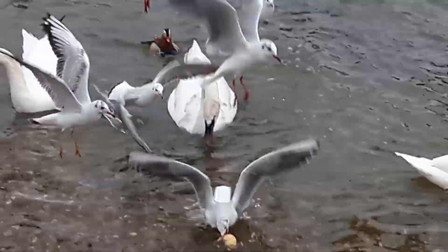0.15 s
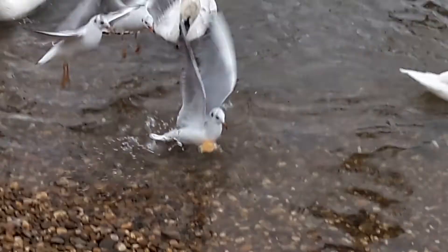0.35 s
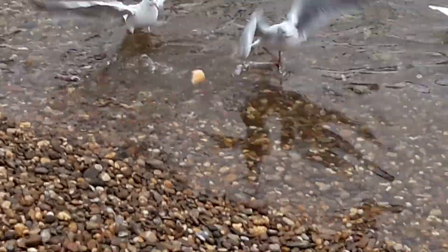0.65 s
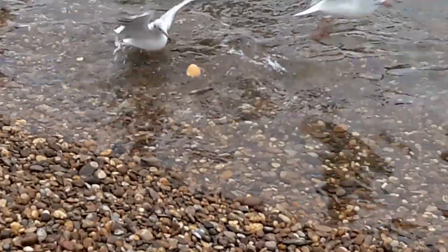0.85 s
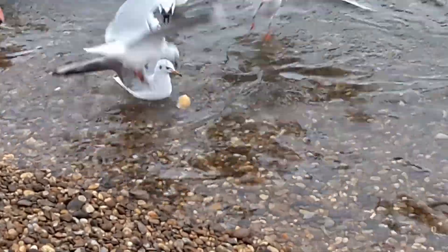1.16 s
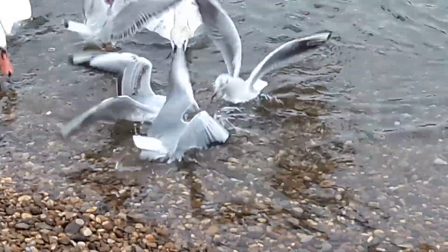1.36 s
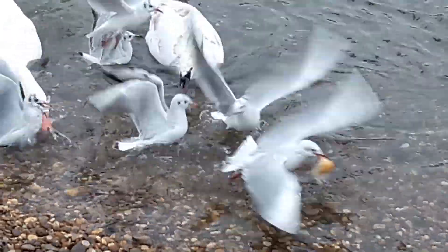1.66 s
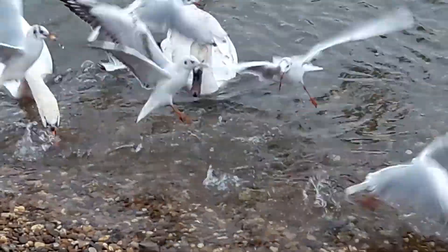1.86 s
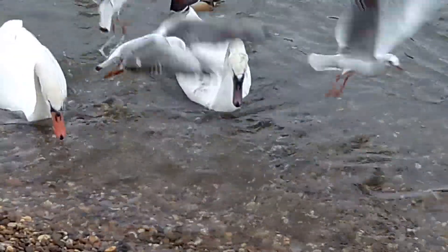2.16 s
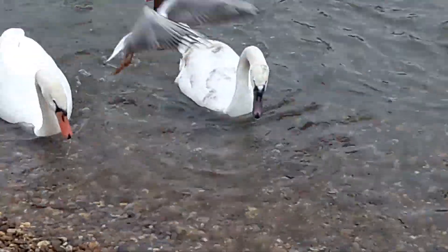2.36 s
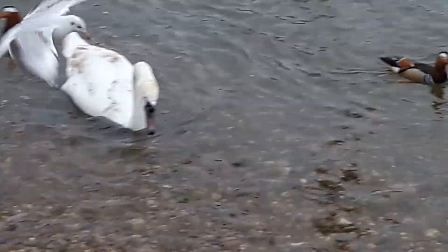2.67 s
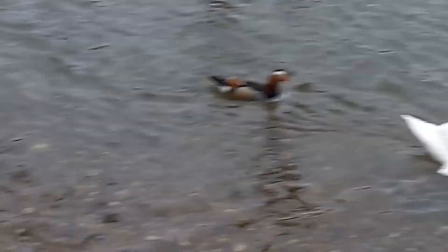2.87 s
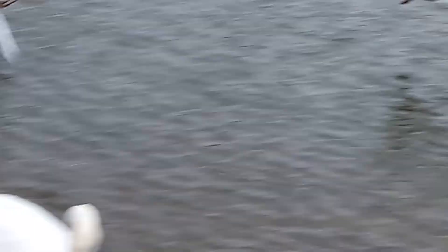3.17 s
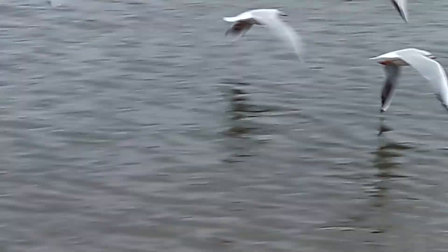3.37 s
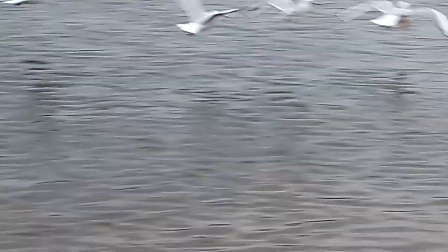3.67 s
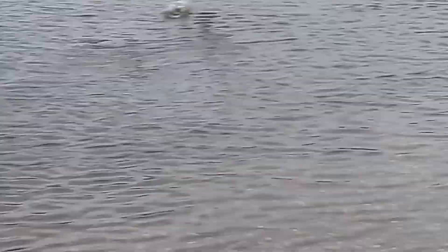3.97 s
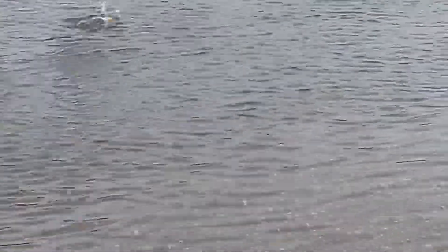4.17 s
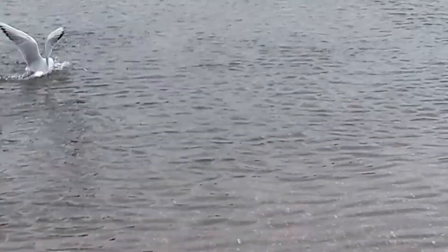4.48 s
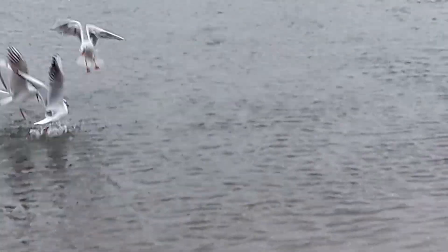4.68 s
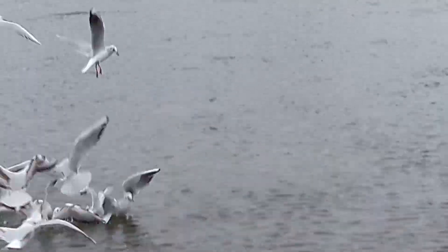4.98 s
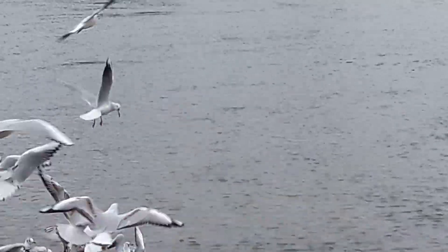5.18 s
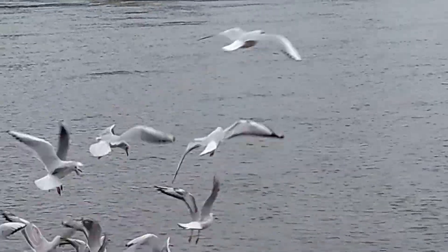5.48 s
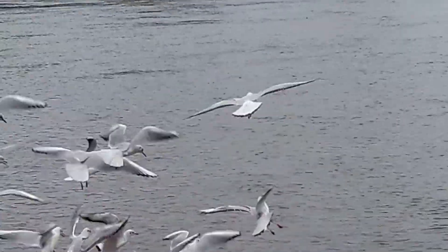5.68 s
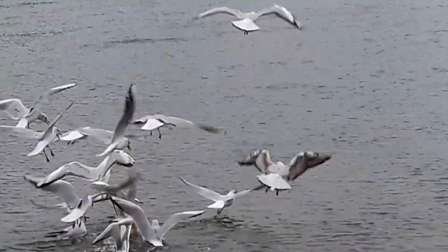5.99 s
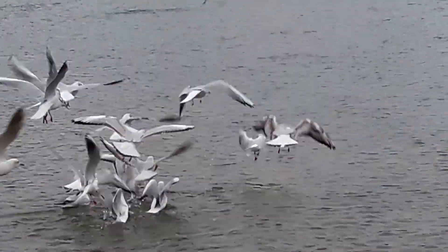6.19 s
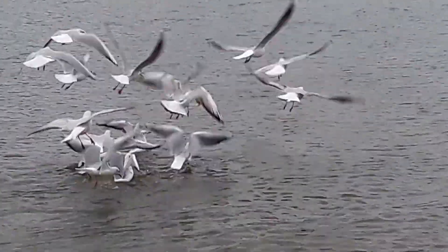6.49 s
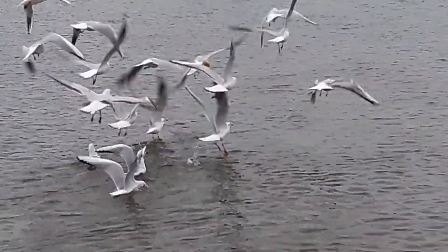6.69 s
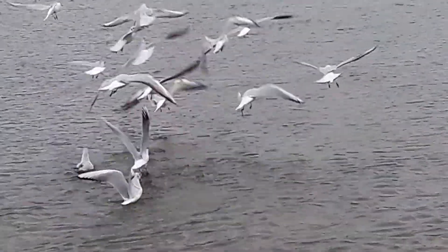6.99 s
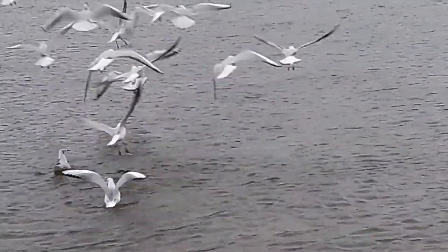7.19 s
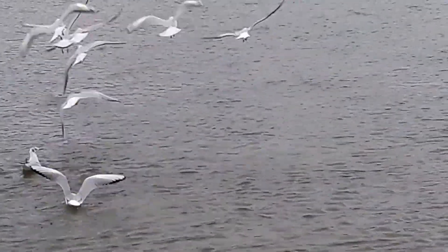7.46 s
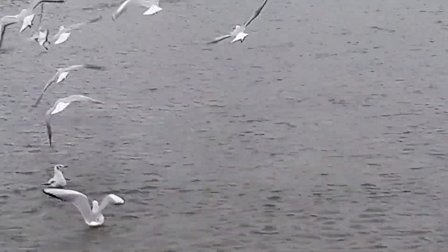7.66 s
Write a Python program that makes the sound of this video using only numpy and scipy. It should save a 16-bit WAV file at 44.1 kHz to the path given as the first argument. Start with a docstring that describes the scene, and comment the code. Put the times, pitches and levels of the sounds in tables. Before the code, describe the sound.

Gulls squabble with harsh yelps and screams over splashes and lapping water, while wind buffets the microphone.

```python
"""Gulls squabbling at a river's edge

A flock fights over bread, close to the microphone at first, then far out on the water. Harsh yelps,
clear mews, drawn-out cries and two long screams overlap, each a syrinx tone chopped into a rasp
and shaped by throat and beak. Wings and feet splash, small waves lap, and wind buffets the stereo
microphone, mostly its left port."""
import sys
import numpy as np
from scipy import signal
from scipy.fft import rfft, irfft, next_fast_len
from scipy.io import wavfile
from scipy.ndimage import uniform_filter1d, map_coordinates

SR = 44100
rng = np.random.default_rng(int(sys.argv[2]) if len(sys.argv) > 2 else 0)


def inscribe(sig):
    """Save sig as 16-bit PCM at rate SR to the path in sys.argv[1].

    A 1-D sig is mono; a 2-D sig holds one channel per row.
    Samples are clipped to [-1, 1] before scaling.
    """
    pcm = np.round(np.clip(np.atleast_2d(sig).T, -1, 1) * 32767)
    wavfile.write(sys.argv[1], SR, pcm.astype(np.int16))


N = 345303
TIME = np.arange(N) / SR

# Harsh cries of the nearer birds: (middle [s], length [s], mid pitch [Hz], glide [octaves],
# roughness [0-1], level [dB], beak opening [dB], strain [dB], beak ring [Hz], right lead [samples])
YELPS = [(0.049, 0.071, 1100, .1, 0.72, -35.5, 7, -3, 3430, -2),
         (0.138, 0.039, 974, 0.019, 0.66, -33.5, -1.5, -13, 2820, -1.5),
         (0.175, 0.054, 1189, 0.045, 0.8, -31.5, 6, 2.5, 3570, -4),
         (.264, 0.044, 1026, 0.0073, 0.23, -26.5, 3, -10, 3100, 6),
         (0.95, 0.11, 1155, 0.015, 0.97, -25.5, 0.5, -4, 3440, 3),
         (1.0, .082, 956, -0.17, 0.74, -33, 2, -2.5, 2930, 2.5),
         (1.049, 0.072, 1008, 0.034, 0.57, -27.5, -6.5, -13, 3500, -2),
         (1.106, 0.028, 844, -0.015, 0.66, -33.5, -7, -25, 3400, 2),
         (1.172, 0.039, 890, -0.079, 0.8, -37.5, 3, -15, 3200, 0),
         (1.207, 0.083, 1065, -0.096, 0.73, -22.5, -3, -8, 3270, -1),
         (1.298, 0.082, 1068, 0.049, 0.68, -26, -1, -5, 3290, 2),
         (1.358, .092, 1004, -0.00016, 0.7, -30, -3.5, -12, 3180, -1.5),
         (1.445, 0.051, 867, -0.077, 0.97, -36.5, -4, -24, 2920, -4.5),
         (1.523, 0.087, 841, 0.036, .6, -31.5, -5.5, -18, 2600, -1.5),
         (1.63, .12, 1053, 0.0082, 0.82, -34, -3, -17, 3070, -7),
         (1.728, .095, 930, -0.18, 0.74, -29, -7, -13.5, 2700, -1.5),
         (1.819, .07, 1055, -0.12, 0.66, -22.5, -18, -22, 2580, .5),
         (1.854, 0.089, 1019, -0.01, 0.9, -32, 1.5, -8, 2950, 5),
         (2.167, 0.094, 760, -0.12, 0.7, -39.5, -7, -15, 2880, 1.5),
         (2.309, .12, 839, 0.077, 0.69, -33.5, -7, -19, 3050, -1.5),
         (2.431, 0.091, 890, -0.01, 0.43, -31, -3.5, -9.5, 2680, 3),
         (2.502, 0.064, 781, -0.11, .4, -31, -14, -22, 3780, 1),
         (2.937, 0.077, 898, 0.055, 0.44, -27.5, -3.5, -26, 2730, 6),
         (3.751, 0.084, 802, 0.015, 0.77, -40.5, -8, -10, 3830, -8),
         (3.97, 0.063, 1059, 0.062, 0.57, -33.5, -6.5, -13, 3130, -2.5),
         (4.243, 0.064, 930, -0.052, 0.8, -45, 3, -2, 2660, -2),
         (4.399, .11, 1069, -0.16, 1.03, -32.5, -2, -10, 3300, 17),
         (4.522, .11, 1034, 0.0031, 0.55, -28.5, -2, -12.5, 3120, -9),
         (4.598, 0.099, 898, -0.018, 0.4, -32.5, 2.5, -4.5, 2760, -1.5),
         (4.672, 0.099, 850, 0.41, 0.4, -34, 3.5, -18, 2610, -5),
         (4.721, 0.062, 1177, 0.22, 0.6, -25, 1, -7, 2870, -2),
         (4.756, 0.08, 1060, -0.018, 0.4, -32, 12, 0, 3100, -2.5),
         (4.797, .11, 1170, -.21, .65, -35, -5, 0.5, 3600, -2.5),
         (4.911, 0.17, 897, -.085, 0.9, -37, -1, -15, 2970, -5),
         (5.229, .12, 1046, 0.12, 0.86, -31, 0, -8.5, 3220, -2.5),
         (5.384, 0.18, 1420, 0.079, 0.65, -40, 4.5, -3, 2900, -2.5),
         (5.636, .11, 1146, 0.26, 0.63, -31, -1, -9.5, 3560, -2),
         (5.749, .16, 1155, 0.12, 0.56, -31.5, -2.5, -4.5, 3190, -2.5),
         (5.843, .08, 1330, .2, 0.5, -40, 9.5, 1, 4100, -2.5),
         (5.93, 0.12, 1068, -0.13, 0.68, -32, -2.5, -7.5, 3080, -2.5),
         (6.016, .13, 1129, .2, 0.62, -31, -1.5, -4, 3500, -3),
         (6.085, .12, 1233, -0.22, 1, -33, .5, -5.5, 3060, -2.5),
         (6.184, .15, 985, 0.29, 0.74, -32, -1, -11, 3050, -2.5),
         (6.273, .17, 1165, -0.034, 0.64, -32.5, -2, -7, 3450, -2.5),
         (6.4, 0.13, 1156, 0.29, 0.83, -34, 2.5, -6.5, 3420, -2),
         (6.457, 0.12, 1093, -0.071, 0.48, -39, 7.5, 2, 3300, -2.5),
         (6.57, .11, 836, 0.23, 0.8, -33.5, -2, -12.5, 3060, -2),
         (6.641, 0.1, 1210, -0.14, 0.48, -39, 2, -10, 3000, -1.5),
         (6.714, 0.085, 850, -.17, 0.73, -38, -4, -25, 2780, -2.5),
         (7.005, 0.092, 930, -0.28, 0.55, -31, -9, -30, 3000, -3),
         (7.178, 0.096, 944, -0.25, .48, -32, -5.5, -18, 2630, 2),
         (7.251, .085, 1026, 0.32, 0.34, -34, -16, -33, 3210, -2.5),
         (7.295, 0.074, 1060, -0.042, 0.9, -38.5, 2, -15, 3560, -3),
         (7.387, .11, 994, .16, 0.94, -38.5, -6, -28, 2890, -3),
         (7.53, 0.081, 1141, -0.022, 0.58, -30.5, 0.5, -14, 2840, -3),
         (7.619, .12, 1073, -.33, 0.83, -36.5, 2, -14, 2820, -3),
         (7.695, 0.14, 1072, 0.12, .7, -34, -6.5, -17, 3270, -4)]
def yelps(gain_db=-0.66):
    """The nearer birds yelp over one another, each from its own direction."""
    out = np.zeros((2, N))
    for s, length, hz, glide, rough, db, beak_db, strain_db, beak_hz, lead in YELPS:
        sound = yelp(length, hz, glide, rough, beak_db, strain_db, beak_hz)
        add(out, s - length / 2, placed(amp(db + gain_db) * sound, lead))
    return out


def yelp(length, hz, glide, rough, beak_db, strain_db, beak_hz, sag=.24):
    """A harsh, gliding cry whose pitch sags with the effort at both ends."""
    push = effort(length)
    pitch = hz * (1 - sag * (1 - push) ** 2) * 2 ** (glide * np.linspace(-.5, .5, len(push)))
    rasp = 0.62 - 0.25 * np.log2(hz / 1034)  # lower cries rasp more deeply
    return cry(push, pitch, rough, rasp, beak_db, strain_db, beak_hz)


def effort(length, swell_s=.05):
    """A cry's push of air: up from 0 to 1, held, and down again."""
    t = np.arange(0, length, 1 / SR)
    return np.clip(np.minimum(t, length - t) / min(swell_s, length / 2), 0, 1)


def cry(push, hz, rough, rasp, beak_db, strain_db, beak_hz):
    """One short cry, loudest and brightest where the push is strongest."""
    throat = min(np.mean(hz) / 1000, 1.12) ** 0.7  # the throat lengthens for low cries
    throat *= 2 ** (.04 * rng.uniform(-1, 1))  # each bird has its own throat and rasp rate
    rasp_hz = 95.5 * 2 ** (.3 * rng.uniform(-1, 1))
    ease_db = 12 * (1 - push) ** 2  # the beak closes and the strain eases towards the ends
    sound = voice(hz, rough, rasp_hz, rasp, beak_db - ease_db, strain_db - ease_db, beak_hz, throat)
    return np.sin(np.pi / 2 * push) ** 1.01 * sound


def syrinx(hz, rough, rasp, flutter, uneven_db, smear_rad=1.55, slip_rad=2.1, croak=.75):
    """A harmonic tone chopped into puffs by the flutter; rasp over 1 shuts it between them."""
    size = len(hz)
    gate = np.maximum(1 - rasp + rasp * abs(np.sin(flutter / 2)), 0)
    gate *= amp(1.67 * rough * wobble(size, 45.45))
    stagger = rough * (0.042 * wobble(size, 300) + .03 * wobble(size, 40))
    # each puff falls in pitch and starts out of step with the last
    bend = .016 * rasp * np.sin(flutter) + stagger
    puff = (flutter // (2 * np.pi)).astype(int)
    offsets = uniform_filter1d(rng.standard_normal(puff[-1] + 1)[puff], size=90)
    phase = 2 * np.pi * np.cumsum(hz * (1 + bend)) / SR + slip_rad * rasp * rough * offsets
    tone = 0
    for k in range(1, 15):  # roughness spreads the partials into bands, the upper ones most
        smear = smear_rad * rough * np.sqrt(k / 3) * wobble(size, 100) + rng.uniform(0, 2 * np.pi)
        tone += amp(uneven_db * wobble(size, 11.7)) * np.cos(k * phase + smear)
    tone += np.clip((hz - 1150) / 240, 0, .5) * np.cos(phase)  # a squeal leans on its fundamental
    # strong and weak cycles alternate, which puts lines halfway between the partials
    tone *= 1 + croak * rough * np.cos(phase / 2 + rough * wobble(size, 39.77))
    chaos = .34 * rough ** 1.5
    return gate * (np.sqrt(1 - chaos ** 2) * unit(tone) + chaos * rng.standard_normal(size))


# Throat resonance, open-beak resonance and the edge that strain adds: (frequency [Hz], gain [dB])
THROAT = [(400, -33), (800, -11.5), (1100, -14), (1450, 3), (1750, 5), (2050, 3), (2400, 2.5), (2750, -6.5),
          (3300, -65)]
BEAK = [(2300, -24), (2750, 4.5), (3200, 1.5), (3700, 5), (4200, 5), (4800, -25)]
EDGE = [(3800, -17), (4400, 7.5), (4800, 6), (5400, 2.5), (6100, 0.5), (7700, -2.5), (8500, -10),
        (9600, -31.5), (12000, -18), (15500, -24)]
def voice(hz, rough, rasp_hz, rasp, beak_db, strain_db, beak_hz, throat, edge=EDGE, uneven_db=5.5):
    """The fluttering syrinx sounds through throat and beak; strain adds a bright edge."""
    rough, rasp = np.clip(rough, 0, 1), np.clip(rasp, 0, 2)
    flutter_hz = rasp_hz * (1 + (0.031 + .12 * rough) * wobble(len(hz), 30.4))
    flutter = 2 * np.pi * (np.cumsum(flutter_hz) / SR + rng.random())
    source = syrinx(hz, rough, rasp, flutter, uneven_db)
    ring_hz = beak_hz * (hz / np.mean(hz)) ** 0.26  # the beak's ring moves with the pitch
    ring = resonate(resonate(source, ring_hz), ring_hz)
    beak = steady(ring + amp(-5.5) * colour(source, BEAK))
    early = .4 * rasp * np.sin(flutter)  # in each puff the throat sounds first, the strain after
    body = steady(colour(source * (1 + early), THROAT, throat))
    strain = steady(colour(source * (1 - early), edge))
    return body + amp(beak_db) * beak + amp(strain_db) * strain


# The course of each long cry: (time [s], pitch [Hz], rasp rate [Hz], rasp depth [ratio],
# roughness [0-1], level [dB], beak opening [dB], strain [dB])
FIRST_SCREAM = [(0.312, 860, 89, 0.5, 0.3, -36, -6, -3), (0.335, 1000, 90.3, 1.1, 0.45, -35, -3, -5.5),
                (0.372, 1183, 92.4, 0.81, 0.52, -27, -17, -4), (0.44, 1162, 91.6, 0.66, 0.51, -26, -13, -5),
                (0.485, 1107, 92.4, 0.63, 1, -24.5, -1, -4), (0.53, 1040, 87.6, 0.9, 0.3, -24.5, -19, -11),
                (0.6, 1000, 83.6, 0.89, 0.55, -21, -13, -9.5),
                (0.645, 981, 82.6, 1.08, 0.44, -20, -16, -9.5), (0.71, 953, 78, 0.92, 0.24, -22, -15, -13),
                (0.8, 975, 76.4, 1.04, 0.18, -20, -18, -18.5),
                (0.84, 895, 76.3, 0.69, 0.42, -30.5, -18, -13.5), (0.87, 780, 76, 1.1, 0.32, -28, -26, -39)]
SECOND_SCREAM = [(2.98, 1124, 101.5, 0.69, 0.54, -33, -24, -4), (3.015, 1333, 108, 0.98, 0.71, -33, -14, 6),
                 (3.08, 1240, 106.5, 0.9, 0.75, -34, 0.5, 1), (3.16, 1201, 108.8, 1, 0.65, -33, -3.5, -3.5),
                 (3.225, 1121, 104.4, 0.84, 0.87, -30, -9, -1.5),
                 (3.3, 1020, 100, 0.71, 0.75, -21.5, -19, -14),
                 (3.335, 1020, 91.6, 0.49, 0.57, -20, -25, -18),
                 (3.4, 1019, 87, 0.52, 0.65, -21, -13.5, -24),
                 (3.445, 990, 83.8, 0.47, 0.62, -22.5, -19, -24),
                 (3.525, 973, 75.6, 0.76, 0.5, -26, -19, -16),
                 (3.55, 896, 73.2, 0.85, 0.4, -27, -21, -14.5),
                 (3.605, 940, 72.3, 0.42, 0.31, -27, -22, -19),
                 (3.655, 720, 72.5, 0.52, 0.37, -32.5, -20, -28)]
FALLING_CRY = [(4.965, 950, 95, 0.5, 0.53, -30, -3, -15), (5.015, 1133, 94.4, 0.64, 0.61, -29.5, 4, -1),
               (5.05, 1130, 95.7, 0.57, 0.62, -31, -2.5, -2.5),
               (5.115, 1063, 89.5, 0.57, 0.78, -30, -2.5, -10.5),
               (5.175, 954, 84, 0.6, 0.67, -37.5, -3, -16)]
ARCHING_CRY = [(5.3, 928, 94, .3, 0.47, -47, -4, -18), (5.34, 1108, 100.3, 0.61, 0.39, -32.5, 1.5, -14),
               (5.385, 1195, 100, 0.59, 0.49, -33, 1, -4), (5.455, 1140, 94.3, 0.6, 0.78, -33.5, 2.5, -9),
               (5.51, 1030, 91.4, 0.45, 0.66, -33.5, 4, -5), (5.545, 877, 85, 0.45, .4, -37, -10, -14)]
DIPPING_CRY = [(6.755, 960, 88.5, 0.48, 0.56, -39.5, -9, -19), (6.82, 1152, 95, 0.73, .55, -29, -3.5, -15),
               (6.876, 1017, 90.5, 0.65, 0.63, -37.5, -5, -23), (6.94, 1030, 90, 0.53, 0.32, -37, -6, -17),
               (6.995, 1133, 90, 0.67, 0.54, -33.5, -5.5, -10), (7.05, 1050, 85, .5, 0.8, -39, -5, -29)]
# A shriller and a thinner edge of strain: (frequency [Hz], gain [dB])
SHRILL = [(4200, -14.5), (4900, 5.5), (5400, 6), (6100, -2.5), (6700, -5), (7400, -2), (8300, -16),
          (9600, -25), (12000, -21), (15500, -18)]
THIN = [(4200, -25), (4800, 12), (5700, -3), (6700, -1), (7400, 3), (8200, -17), (9600, -32), (15500, -25)]
# The long callers and their bearing from the microphone: (course [table], throat tuning [ratio],
# beak ring [Hz], edge [table], right lead at start [samples], right lead at end [samples])
LONG_CRIES = [(FIRST_SCREAM, 0.98, 3580, EDGE, 0, 0), (SECOND_SCREAM, 0.9, 3050, SHRILL, -3, -24),
              (FALLING_CRY, 1.07, 2520, THIN, -5, -4), (ARCHING_CRY, 1.13, 3150, EDGE, -2, -2.3),
              (DIPPING_CRY, 1.05, 3260, EDGE, -1.8, -1.8)]
def long_cries(gain_db=-1.22, fade_s=0.014, uneven_db=2.0):
    """Screams and drawn-out cries: pitch, flutter and strain rise and fall with the effort."""
    out = np.zeros((2, N))
    for course, throat, beak_hz, edge, first_lead, last_lead in LONG_CRIES:
        s, *columns = np.transpose(course)
        t = np.arange(s[0], s[-1], 1 / SR)
        hz, rasp_hz, rasp, rough, db, beak_db, strain_db = (np.interp(t, s, c) for c in columns)
        fade = np.clip(np.minimum(t - t[0], t[-1] - t) / fade_s, 0, 1)
        sound = voice(hz, rough, rasp_hz, rasp, beak_db, strain_db, beak_hz, throat, edge, uneven_db)
        lead = np.linspace(first_lead, last_lead, len(t))
        add(out, s[0], placed(amp(db + gain_db) * fade * sound, lead))
    return out


# Clear cries among the yelps: (middle [s], length [s], start pitch [Hz], mid pitch [Hz],
# end pitch [Hz], level [dB], beak opening [dB], strain [dB], beak ring [Hz], right lead [samples])
MEWS = [(0.084, 0.11, 1266, 1092, 790, -37, 4.5, -9, 3300, -2),
        (3.673, 0.14, 938, 834, 600, -40.5, -13, -22, 2500, -7),
        (4.324, 0.14, 1190, 1188, 1090, -47, 10, 10, 3660, -2),
        (7.509, 0.18, 1186, 1423, 1350, -35.5, -12, -7.5, 2800, -3)]
def mews(rough=.16, rasp=.25, waver=.011):
    """Gliding, wavering cries with hardly any rasp."""
    out = np.zeros((2, N))
    for s, length, first_hz, mid_hz, last_hz, db, beak_db, strain_db, beak_hz, lead in MEWS:
        push = effort(length)
        arch = np.linspace(-1, 1, len(push))
        hz = mid_hz + (np.where(arch < 0, first_hz, last_hz) - mid_hz) * abs(arch) ** 1.4
        hz *= 1 + waver * wobble(len(push), 30.0)
        sound = cry(push, hz, rough, rasp, beak_db, strain_db, beak_hz)
        add(out, s - length / 2, placed(amp(db) * sound, lead))
    return out


# Bouts of excitement farther off: (start [s], end [s], rate [cries/s], level [dB])
SQUABBLES = [(0.1, 1.9, 3, -55), (4.5, 4.93, 8.05, -43.5), (5.7, 6.6, 10, -41), (7.4, 9, 8.7, -44.5)]
def far_flock(length_s=.11, pitch_hz=1020, spread_octaves=0.3, spread_db=3):
    """Farther birds yelp at random, left of centre, each with its own pitch and strength."""
    out = np.zeros((2, N))
    for start, end, per_s, db in SQUABBLES:
        for s in np.arange(start, end, 1 / per_s):
            late, long, high, loud, side, rise = rng.uniform(-1, 1, 6)
            sound = yelp(length_s * 1.4 ** long, pitch_hz * 2 ** (spread_octaves * high),
                         glide=.3 * rise, rough=0.48, beak_db=-2, strain_db=-11, beak_hz=3100)
            add(out, s + late / per_s / 2, placed(amp(db + spread_db * loud) * sound, 2 * side - 3.5))
    return out


# The flock is close at first, then far out on the water: (time [s], top octave gain [dB])
NEARNESS = [(0, 1), (1.5, 5), (3.3, 0), (4.2, -5.5), (6, -4.5), (7.8, -28)]
def through_air(x):
    """Distance takes the top octave off the cries."""
    top = colour(x, [(7000, -40), (9500, 0)])
    return x + (amp(np.interp(TIME, *np.transpose(NEARNESS))) - 1) * top


def shore(x, tail_db=-11, t60=0.18, slap_db=-15, taps_per_s=2500):
    """The water throws back a quick reflection; the banks add a thin, short tail."""
    t = np.arange(SR // 2) / SR
    taps = rng.choice([-1., 1.], (2, len(t)))
    taps *= (rng.random((2, len(t))) < taps_per_s / SR) * (t > .002)
    tail = taps * amp(-60 * t / t60)
    slap = taps[::-1] * np.exp(-t / 0.00028)
    echo = amp(tail_db) * tail / np.linalg.norm(tail[0]) + amp(slap_db) * slap / np.linalg.norm(slap[0])
    return signal.fftconvolve(x, echo, axes=1)[:, :N]


# Wings and feet hitting the river: (time [s], level [dB], decay [s])
SPLASHES = [(0.4, -25, 0.15), (1.564, -34.5, 0.0087), (1.944, -37, 0.013), (2.044, -32.5, 0.0022),
            (4.521, -37.5, 0.11), (4.73, -40.5, 0.38), (5.992, -28.5, 0.036), (7.187, -36.5, 0.0046)]
# The colour of spray and drops: (frequency [Hz], gain [dB])
SPRAY = [(300, -9), (1000, 11), (2500, 10.5), (5000, 3.5), (8000, -2.5), (9800, -13), (12000, -4),
         (15500, -17)]
# Bubbles left by a plunge: (time [s], level [dB], starting pitch [Hz], decay [s])
PLOPS = [(1.932, -35, 1330, 0.0062), (1.946, -18, 986, 0.0022), (2.119, -24, 1040, 0.0016),
         (2.194, -25, 1900, 0.0024), (2.797, -42, 2680, .0027)]
def splashes(drops_db=-63, drops_per_s=45):
    """Stray drops patter, spray bursts up and bubbles ring briefly."""
    t = np.arange(SR // 4) / SR
    drops = (rng.random(N) < drops_per_s / SR) * amp(2.7 * np.minimum(rng.exponential(1, N), 3))
    tick = rng.standard_normal((2, len(t))) * np.exp(-t / 0.0013)
    patter = signal.fftconvolve(drops[None], tick, axes=1)[:, :N]
    out = amp(drops_db) * unit(colour(patter, SPRAY))
    for s, db, decay in SPLASHES:
        spray = rng.standard_normal((2, len(t))) + rng.standard_normal(len(t))
        spray *= amp(3.5 * wobble(len(t), 300))
        envelope = np.exp(-t / decay) * (1 - np.exp(-6 * t / decay))
        add(out, s, amp(db) * unit(colour(spray, SPRAY)) * envelope)
    for s, db, hz, decay in PLOPS:
        envelope = np.exp(-t / decay) * (1 - np.exp(-t / 0.00044))
        bubble = np.sin(2 * np.pi * hz * t * (1 + 3 * t)) * envelope
        add(out, s, placed(amp(db) * bubble, 0))
    return out


# Wind at the microphone, whose left port faces it: (time [s], left level [dB], right level [dB])
WIND = [(.1, -46, -55), (.35, -34, -47), (.85, -27, -36.5), (1.2, -34, -35.5), (1.45, -32, -30.5),
        (1.65, -33.5, -46), (2.2, -29.5, -36.5), (2.5, -25, -40), (2.9, -22.5, -40), (3.25, -31.5, -44),
        (3.7, -26, -41), (4.1, -32.5, -46), (4.45, -37.5, -57), (5.8, -39.5, -39.5), (6.4, -29.5, -43.5),
        (6.8, -37, -38), (7.1, -31, -41), (7.8, -32.5, -48)]
# Its rumble in the ports: (frequency [Hz], gain [dB])
RUMBLE = [(20, -34), (40, -32), (70, -12), (125, -0.5), (200, -2.5), (330, -11), (500, -20.5), (800, -21),
          (1500, -41), (4000, -76)]
def wind(lump_db=4.5, eddy_db=-7, eddy_growth=0.61):
    """Lumpy turbulence, unrelated at the two ports; stronger gusts shed smaller, higher eddies."""
    eddy_colour = [(90, -38), (220, 3), (380, 1.5), (600, -3), (1000, -26.5), (2000, -66), (5000, -79)]
    s, *ports = np.transpose(WIND)
    out = []
    for port in ports:
        db = np.interp(TIME, s, port)
        lumps = rng.standard_normal(N) * amp(lump_db * np.minimum(wobble(N, 21.0), 2))
        swirls = rng.standard_normal(N) * amp(4.4 * np.minimum(wobble(N, 25), 2))
        eddies = amp(eddy_db + eddy_growth * (db + 28)) * unit(colour(swirls, eddy_colour))
        out.append(amp(db) * (unit(colour(lumps, RUMBLE)) + eddies))
    return np.array(out)


# Strong eddies right on the microphone: (time [s], level [dB], pitch [Hz], left minus right [dB])
THUMPS = [(1.431, -17.5, 164, -26), (2.025, -18, 317, 27), (2.041, -20, 337, 21), (2.12, -30, 303, 7),
          (2.194, -27, 257, 6), (2.357, -10, 296, 28), (2.373, -8.5, 540, 35.0), (2.409, -13, 387, 24),
          (2.578, -23, 280, 23), (2.601, -8.5, 287, 34), (2.774, -19.5, 290, 22), (2.796, -18, 337, 28),
          (2.809, -11, 403, 28.0), (2.825, -27, 429, 26.0), (2.85, -12.5, 393, 27.5),
          (2.873, -11.5, 356, 25.0), (2.887, -13, 347, 35.5), (2.927, -9.5, 450, 29), (2.943, -17, 366, 18),
          (2.954, -10, 372, 29.0), (3.079, -10.5, 356, 34), (3.784, -10.5, 300, 27), (3.816, -9, 370, 34),
          (3.822, -5.5, 406, 35), (3.828, -2.5, 427, 41.5), (3.882, -14.5, 310, 23), (3.978, -18, 326, 19),
          (4.028, -14.5, 400, 20), (4.073, -12.5, 414, 33.0), (4.1, -29, 342, 12.5), (4.118, -26, 404, 20),
          (4.19, -18.5, 320, 19), (4.26, -19.5, 345, 24), (4.307, -20.5, 365, 21), (4.317, -21, 285, 32.0),
          (4.61, -24.5, 276, 21.5), (4.868, -21, 336, 22), (4.9, -20, 353, 19), (5.124, -20.5, 308, 25),
          (5.203, -20.5, 275, 25), (5.483, -21.5, 363, 27), (5.649, -19, 295, 24), (5.662, -24, 367, 26.5),
          (5.711, -16, 327, 16), (5.996, -10.5, 464, 30.5), (6.285, -17.5, 329, 22.5),
          (6.292, -13.5, 434, 29), (6.4, -22.5, 420, 18), (6.459, -18, 303, 22.5), (6.47, -23, 331, 21),
          (6.525, -24, 397.3, 25.0), (6.676, -9.5, 382, 34), (6.948, -20, 512, 19),
          (7.001, -19.5, 339, 23.5), (7.663, -23.5, 412, 29.0), (7.69, -21, 449, 17)]
def thumps(count=36, small_db=-26, spread_db=3, small_hz=430, far_port_db=-17, buffeting_s=(4.3, 7.8)):
    """Strong eddies thump the ports; small ones strike at random while they face open water."""
    out = np.zeros((2, N))
    for s, db, hz, balance_db in THUMPS:
        add(out, s - .5 / hz, amp(np.minimum([[balance_db], [-balance_db]], 0)) * eddy(db, hz))
    for when, loud, high in rng.uniform(-0.9, 1, (count, 3)):
        swing = eddy(small_db + spread_db * loud, small_hz * 2.22 ** high)
        add(out, np.interp(when, (-1, 1), buffeting_s), amp([[0], [far_port_db]]) * swing)
    # the thumps boom near 70 Hz, with the lowest rumble cut away
    return colour(out, [(20, -34), (70, 12), (160, -3.0)])


def eddy(db, hz, decay_cycles=.52):
    """An eddy striking a port gives a sudden pressure swing of a cycle or two."""
    turns = hz * np.arange(SR // 25) / SR
    wave = np.sin(2 * np.pi * turns) * turns * np.exp(-turns / decay_cycles)
    return amp(db) * wave / abs(wave).max()


# The wash fades as the microphone turns from the pebbles to open water: (time [s], level [dB])
WASH_LEVEL = [(0, -41), (2.6, -52.5), (4.1, -50), (5.6, -45.5), (7.8, -51.5)]
# The river heard from its edge: (frequency [Hz], gain [dB])
RIVER = [(40, -14), (150, -9), (400, 1.5), (800, 3), (1600, 5), (3000, -4.5), (5000, -15), (8000, -16),
         (9600, -48), (12500, -19), (15500, -29)]
def waves(lap_db=4, lap_hz=5.83):
    """Small waves lap at the shore in an unevenly swelling wash."""
    wash = colour(rng.standard_normal((2, N)) + 1.1 * rng.standard_normal(N), RIVER)
    laps_db = lap_db * np.minimum(wobble(N, lap_hz), 1)
    return amp(np.interp(TIME, *np.transpose(WASH_LEVEL)) + laps_db) * unit(wash)


def breeze(db=-44, swell_db=4.0):
    """The deep flutter of moving air, equally strong at both ports."""
    spectrum = [(20, -26), (40, -9.5), (80, 2.0), (140, -0.5), (260, -21.5), (700, -40.0)]
    air = colour(rng.standard_normal((2, N)), spectrum)
    return amp(db + swell_db * wobble(N, 3.9)) * unit(air)


def amp(db):
    """Decibels to gain."""
    return 10 ** (np.asarray(db) / 20)


def unit(x):
    """Scales to rms 1."""
    return x / np.sqrt(np.mean(x ** 2) + 1e-20)


def steady(x):
    """Scales to rms 1 over every 35 ms."""
    return x / np.sqrt(abs(uniform_filter1d(x ** 2, size=1544)) + 1e-12)


def colour(x, points, shift=1):
    """Filters by (frequency [Hz], gain [dB]) points, moved up or down by the factor shift."""
    size = next_fast_len(x.shape[-1] + 512)
    hz, db = np.transpose(points)
    gain = amp(np.interp(np.log(np.fft.rfftfreq(size, 1 / SR) + 1), np.log(hz * shift), db))
    return irfft(rfft(x, size) * gain, size)[..., :x.shape[-1]]


def resonate(x, hz, width_hz=1160):
    """A resonance of gain 1 that follows the curve hz."""
    turn = np.exp(2j * np.pi * np.cumsum(hz) / SR)
    pole = np.exp(-np.pi * width_hz / SR)
    return 2 * (turn * signal.lfilter([1 - pole], [1, -pole], x / turn)).real


def wobble(size, hz):
    """Random drift of rms 1, no faster than about hz."""
    knots = np.arange(size) * 3 * hz / SR + rng.random()
    values = rng.standard_normal(int(knots[-1]) + 2)
    return np.sqrt(3 / 2) * np.interp(knots, np.arange(len(values)), values)


def placed(x, lead):
    """The sound reaches the right port lead samples before the left (after it, if negative)."""
    at = np.arange(len(x))
    return np.array([map_coordinates(x, [at + side * lead / 2], order=3) for side in (-1, 1)])


def add(mix, s, sound):
    """Mixes a two-channel sound in at time s."""
    part = mix[:, max(round(s * SR), 0):][:, :sound.shape[1]]
    part += sound[:, :part.shape[1]]


def scene():
    """Gulls over the water, heard from the bank with wind on the microphone."""
    gulls = through_air(yelps() + mews() + long_cries() + far_flock())
    gulls = amp(-0.12) * (gulls + shore(gulls))
    water = (waves() + splashes()) * amp([[1.1], [-1.1]])  # a little louder on the left
    return gulls + water + breeze() + wind() + thumps()


def record(dry, cutoff_hz=15800):
    """A band-limited stereo microphone whose left port is a little brighter."""
    left = colour(dry[0], [(1000, 1.56), (4500, 0.54), (8000, -0.13), (15000, 1.1)])
    right = colour(dry[1], [(1000, 1.0), (4500, 0.39), (8000, -0.31), (15000, -1.3)])
    lowpass = signal.firwin(511, cutoff_hz, window=("kaiser", 9), fs=SR)
    return signal.oaconvolve(np.array([left, right]), lowpass[None], "same")


dry = scene()
out = record(dry)
inscribe(out)
```